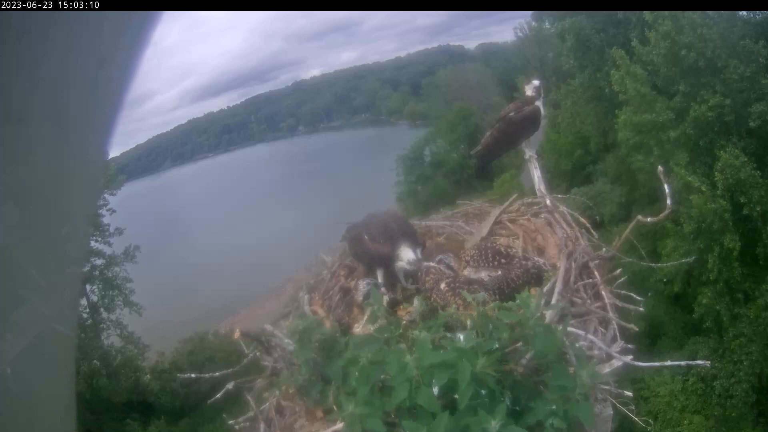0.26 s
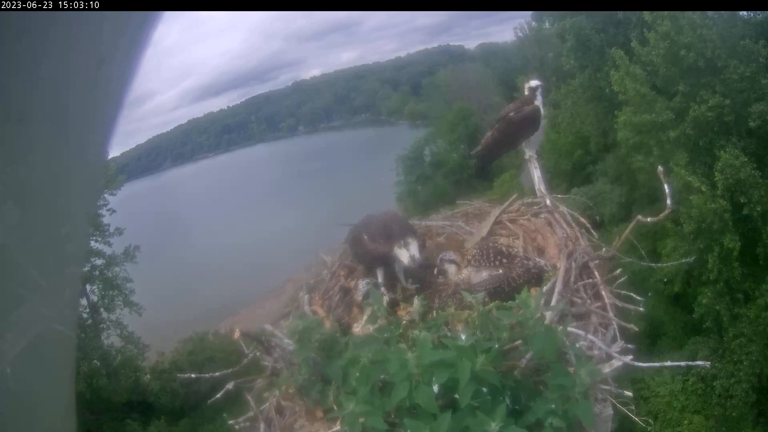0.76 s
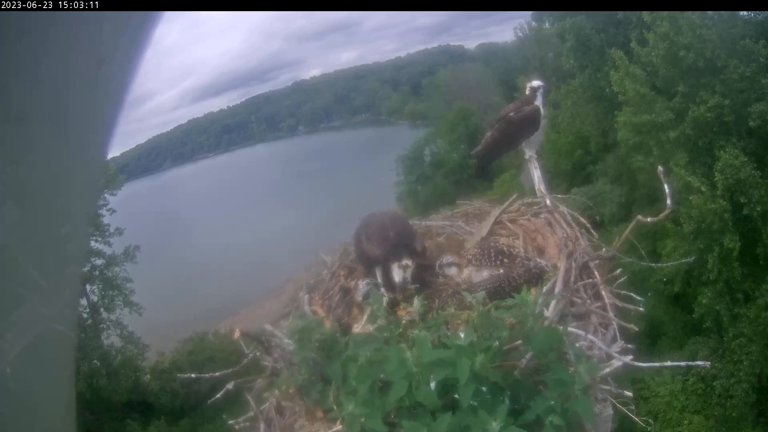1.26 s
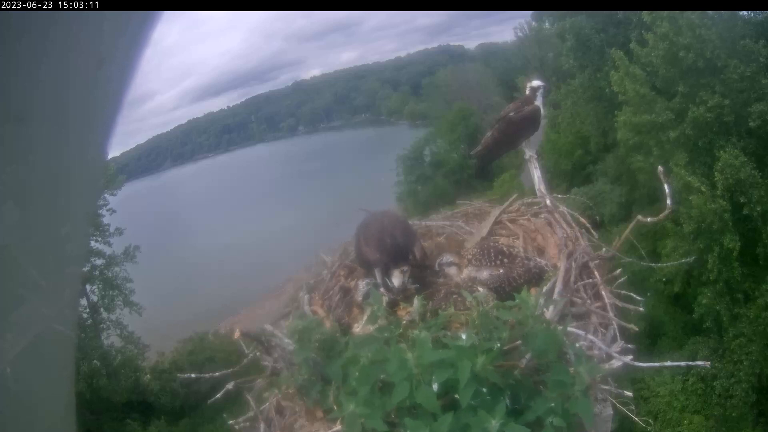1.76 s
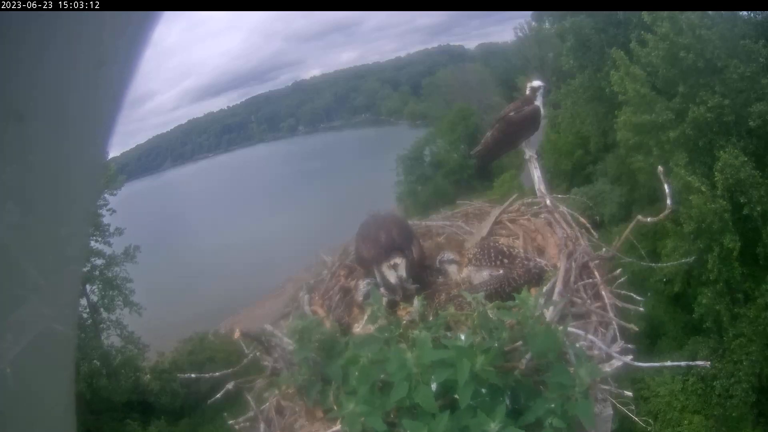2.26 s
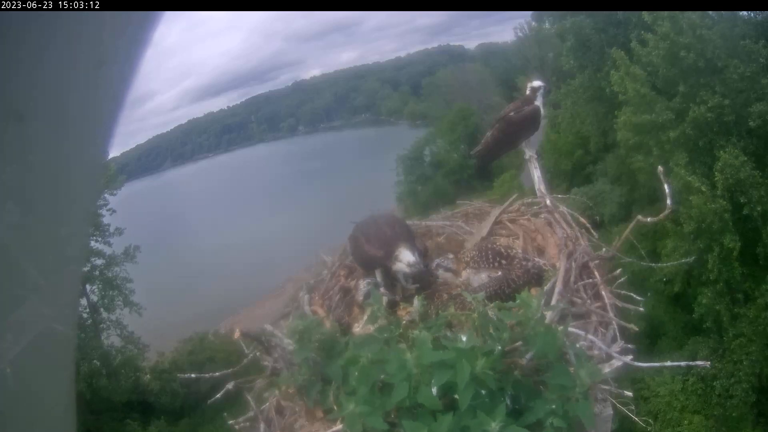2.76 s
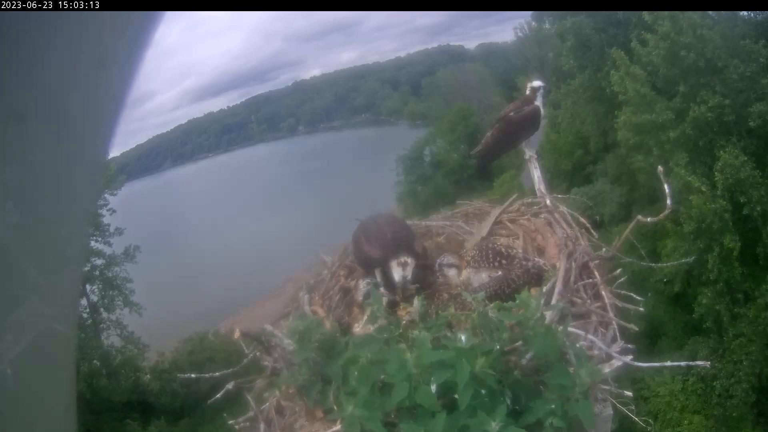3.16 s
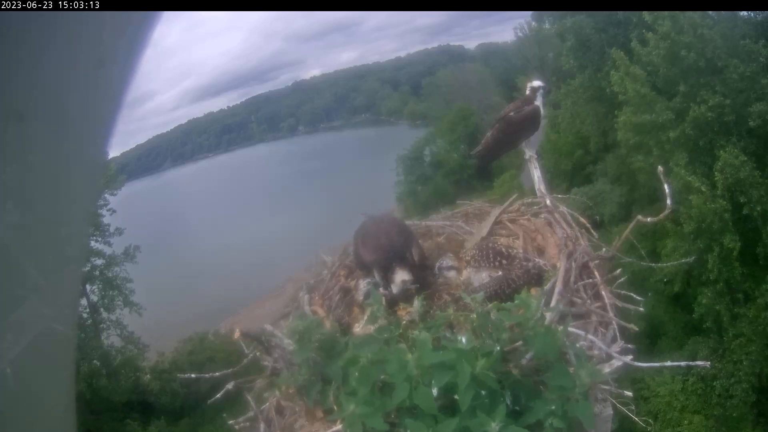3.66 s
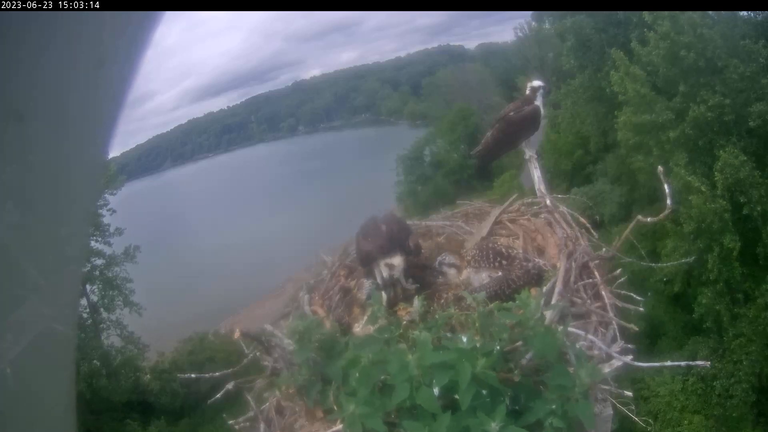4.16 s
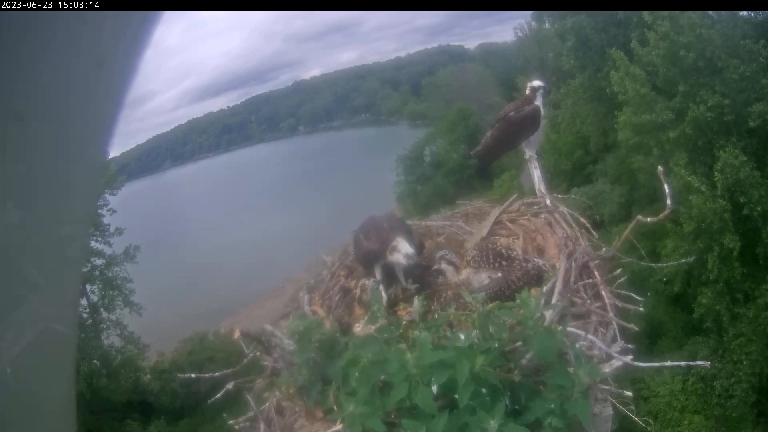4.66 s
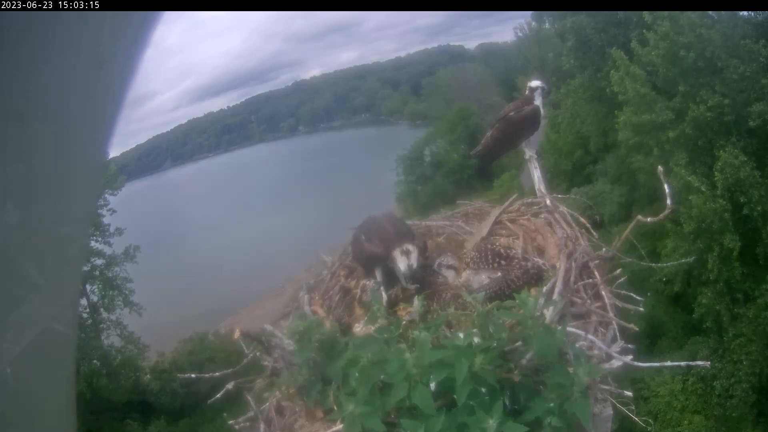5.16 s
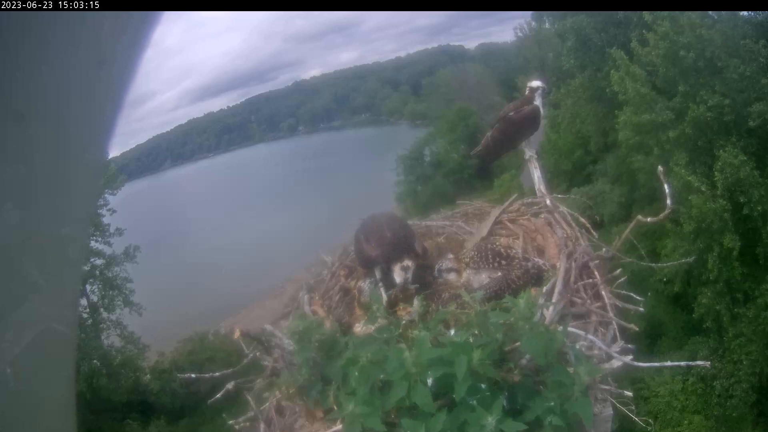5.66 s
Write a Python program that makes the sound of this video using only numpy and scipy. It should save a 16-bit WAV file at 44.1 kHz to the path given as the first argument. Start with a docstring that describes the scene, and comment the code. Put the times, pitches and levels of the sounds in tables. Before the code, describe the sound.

A quiet outdoor nest is heard from a small nearby microphone, with low wind rumble and a faint hiss of leaves throughout. In the first second, twigs shift softly, beaks click dryly, osprey chicks give thin chirps and the parent adds one short, lower whistle. A distant songbird pipes about six even, high notes until 1.2 seconds. A gust bumps the microphone just after 1 second. Short, cracking chirps and clicks come in clusters from 1.3 to 2.4 seconds, with a tiny rattle of ticks near 1.7. The chicks pause, the parent gives one clear whistle at 2.9 seconds, and another gust rumbles around 3.3. From 3.9 to 5.7 seconds the scratchy chirps and beak clicks resume, with a few very brief parent calls between 4.6 and 5. Behind them a far warbler twitters faintly, ending in quick falling notes.

```python
"""A parent osprey gives clear, arched whistles while feeding its chicks in a treetop nest above a lake.
The chicks answer with thin, cracking chirps, led by dry beak clicks. Each voice is a tiny vibrating
membrane that turns rough when strained; each click is a beak snapping shut and ringing briefly.
Twigs shift in the nest, songbirds sing far off in the woods, leaves hiss, and light gusts rumble
on the microphone of a small nest camera."""
import sys
import numpy as np
from scipy import signal
from scipy.fft import rfft, irfft
from scipy.io import wavfile

SR = 44100
rng = np.random.default_rng(int(sys.argv[2]) if len(sys.argv) > 2 else 0)


def unload_audio(sound):
    """Save the sound as a 16-bit wav file, at the path given as the first command line argument."""
    columns = np.transpose(np.atleast_2d(sound))
    # keep every value between -1 and 1, then stretch to whole-number steps
    steps = np.round(np.clip(columns, -1, 1) * 32767)
    wavfile.write(sys.argv[1], SR, steps.astype(np.int16))


N = 260190
TIME = np.arange(N) / SR

# The parent's whistles: start/s, length/s, first f/Hz, top f/Hz, last f/Hz, place of the top/0-1,
# level/dB, swell/dB, roughness/0-1, 2nd harmonic/dB, 3rd harmonic/dB, 4th harmonic/dB
PARENT_WHISTLES = [ (.437, 0.067, 1750, 1894, 1790, 0.49, -37.5, 1, 0.02, -8, -8.5, -23),
                   (2.909, 0.072, 1776, 1902, 1795, 0.58, -35.5, -1.8, 0.021, -8.3, -15, -13.5),
                   (4.582, 0.0247, 1854, 1900, 1665, 0.06, -40.5, -0.26, 0.3, -3.5, -8.5, -34),
                   (4.745, 0.04, 1526, 1558, 1767, 0.031, -47.5, 0.62, 0.12, -7.5, -15, -22),
                   (4.979, 0.016, 1413, 1516, 1620, 0.96, -52, -2, 0.023, -5, -6, -14)]
# The chicks' chirps: the same columns, up to 2nd harmonic/dB
CHICK_CHIRPS = [ (.304, 0.055, 2245, 2517, 2280, 0.74, -42, 4, 0.05, -14.5),
                (.696, 0.023, 3680, 4240, 3440, 0.38, -46, -12, 0.03, -36),
                (.725, 0.021, 2970, 3180, 3840, 0.36, -52.5, -15, 0.16, -37),
                (1.329, 0.066, 2520, 3213, 3155, 0.79, -49, 17, 0.13, -14.5),
                (1.674, 0.042, 2680, 2940, 3050, 0.9, -45, 6.5, 0.11, -20),
                (1.987, 0.017, 2430, 2660, 2330, 0.4, -55.5, -2, 0.2, -27),
                (2.023, 0.039, 2896, 3150, 3030, 0.75, -45.5, -2.5, 0.2, -24),
                (2.287, 0.012, 4740, 5620, 5800, 1, -46.5, -9, 0.06, -17),
                (2.316, 0.015, 3800, 3800, 2980, 0.1, -48.5, 7, 0.29, -9),
                (2.333, 0.0079, 2665, 2800, 3670, 0.24, -46, 1, 0.37, -2),
                (2.344, 0.026, 2960, 3000, 3200, 0.6, -44.5, -4, 0.28, -8.5),
                (3.907, 0.059, 2560, 2884, 2930, 1, -55.5, 3, 0.19, -6.5),
                (4.239, 0.04, 2930, 3710, 3000, 0.62, -53, 8, 0.23, 0),
                (4.287, 0.043, 2796, 3044, 2750, 0.3, -55, -5, 0.38, -7),
                (4.525, 0.059, 2556, 2550, 2680, 0.8, -56, 9, .22, -7),
                (4.795, 0.067, 2350, 2694, 2590, 0.74, -49.5, 10.5, 0.08, -25),
                (5.07, 0.045, 2430, 2910, 2220, 0.18, -54.5, -1, 0.26, -20),
                (5.29, 0.026, 3330, 4220, 4370, 0.85, -44.5, 0, 0, -9.5),
                (5.318, .005, 4170, 3950, 3500, 0.2, -40, -4, 0.1, -13),
                (5.335, 0.031, 2800, 2905, 2790, 0.4, -54.5, -10, 0.1, -2),
                (5.639, 0.044, 2830, 2730, 2975, 0.45, -46, -1.5, 0.16, -6.5)]
# Soft peeps in the nest: middle t/s, f/Hz, level/dB, slide/(octaves per s)
NEST_PEEPS = [(1.255, 3300, -62, 0.5), (4.852, 3480, -55.5, -10), (5.014, 2260, -56.5, 5)]
# Beak clicks: t/s, level/dB, hardness as treble boost/(dB per octave)
BEAK_CLICKS = [(.388, -39.5, 9), (.4405, -40, 1), (.64, -44.5, -1), (.7162, -44.5, 0.5),
               (.767, -43.5, -0.5), (1.293, -40.5, 0.5), (1.303, -44, 4.5), (1.623, -44.5, 1.5),
               (1.632, -48, 2), (1.64, -49.5, -4.5), (1.944, -39.5, 0), (1.957, -39, 2.5),
               (2.2379, -45.5, -2.5), (2.246, -52.5, -3), (2.3226, -45, 3), (3.854, -43.5, 1),
               (4.133, -68.5, 19), (4.282, -45.5, -1), (4.318, -52, 3), (4.722, -47, -3.5),
               (4.729, -43, 4.5), (4.9614, -45, -3), (4.969, -46.5, 0.5), (5.328, -47.5, -2),
               (5.566, -45.5, .5)]
# The tones a beak rings with: f/Hz, level/dB, t60/s (the time it takes to fade by 60 dB)
BEAK_TONES = [(463, 12.5, 0.003), (1650, 0.5, 0.014), (2364, -8.5, 0.03), (3500, -12.5, 0.0053),
              (5300, -24.5, 0.0027)]
# Twigs shifting underfoot: t/s, half width/s, level/dB, t60/s
TWIG_SHIFTS = [(0.159, .025, -58.5, .002), (0.614, 0.0098, -51.5, .06)]
# A far songbird's even piping: middle t/s, level/dB
PIPING_NOTES = [(0.214, -55.5), (0.52, -52), (0.721, -53.5), (0.865, -53), (1.015, -53.5), (1.163, -53.5)]
# A far warbler's twitter: middle t/s, f/Hz, level/dB
TWITTER_NOTES = [(4.11, 5270, -61.5), (4.45, 4350, -58.5), (4.52, 5190, -62), (4.63, 4400, -60),
                 (4.719, 4350, -57.5), (4.87, 4560, -57)]
# The falling notes that end its song: middle t/s, level/dB
FALLING_NOTES = [(5.046, -58), (5.2, -57), (5.352, -59), (5.512, -65)]
# How loudly the treetops hiss: t/s, level/dB
LEAF_LEVELS = [(0, -69.5), (1.5, -74), (3.15, -68.5), (3.6, -73), (5.3, -64.5), (5.8, -75.5)]
# Gusts on the microphone: t/s, half width/s, level/dB
WIND_GUSTS = [(.1, 0.64, -48), (1.065, 0.036, -34.5), (1.19, 0.11, -41.5), (1.629, 0.098, -50),
              (1.97, 0.037, -44), (2.75, .35, -55.5), (3.28, 0.12, -41), (5.6, .45, -56.5)]
# Short dips in the rumble: t/s, half width/s, depth/0-1
RUMBLE_LULLS = [(4.76, 0.12, 0.65)]
# The tone colour of the wind, the air over the lake and the leaves: f/Hz, level/dB
WIND_SPECTRUM = [(14, 9.5), (35, -3.5), (75, -12.5), (110, -20.5), (300, -60.5)]
AIR_SPECTRUM = [(90, 5.5), (250, -3.5), (450, -6.5), (720, -5.5), (1050, -11), (4500, -19.5), (7000, -25.5)]
LEAF_SPECTRUM = [(2300, -27.5), (4500, 2), (6500, -3.5), (7400, -8.5), (8000, -31.5)]

QUAVERS_PER_S = 190   # how fast the voices in the nest tremble


def from_db(db):
    return 10 ** (np.asarray(db) / 20)


def rms_one(x):
    """Scale a sound to an average strength (rms) of 1."""
    return x / np.sqrt(np.mean(x ** 2) + 1e-20)


def low_pass(x, hz, order=2):
    return signal.sosfilt(signal.butter(order, hz, fs=SR, output="sos"), x)


def wander(per_s):
    """A random curve, roughly between -1 and 1, that heads for a new value per_s times a second."""
    steps = np.arange(N) * per_s / SR
    return 1.2 * np.interp(steps, np.arange(N), rng.standard_normal(N))


def coloured_noise(spectrum):
    """Noise with the given tone colour, falling steeply beyond the ends of the table."""
    hz, db = np.transpose(spectrum)
    f = np.maximum(np.fft.rfftfreq(N, 1 / SR), 1)
    gain = from_db(np.interp(np.log(f), np.log(hz), db))
    gain /= (1 + (f / hz[-1]) ** 8) * (1 + (hz[0] / f) ** 4)
    return rms_one(irfft(rfft(rng.standard_normal(N)) * gain, N))


def ring(taps, hz, t60):
    """Every tap starts a pure tone that dies away."""
    decay, turn = 1000 ** (-1 / (t60 * SR)), 2 * np.pi * hz / SR
    return signal.lfilter([0, np.sin(turn)], [1, -2 * decay * np.cos(turn), decay ** 2], taps + 1e-18)


def echoes(x, t60):
    """Countless small echoes from branches and leaves, dying away."""
    tail = rng.standard_normal(SR) * from_db(-60 * TIME[:SR] / t60)
    return signal.fftconvolve(x, tail / np.linalg.norm(tail))[:N]


def note_span(start, end, edge_s):
    """The samples one note covers, and a curve that fades it in and out."""
    at = np.arange(max(int((start - edge_s) * SR), 0), min(int((end + edge_s) * SR), N))
    inside = np.minimum(TIME[at] - start, end - TIME[at]) / edge_s + 1
    return at, np.sin(np.pi / 2 * np.clip(inside, 0, 1)) ** 2


def soft_notes(notes, half_length_s, waver, wavers_per_s):
    """Pure notes that swell and fade while their pitch wavers and may slide."""
    out, shake = np.zeros(N), 1 + waver * wander(wavers_per_s)
    for s, hz, db, octaves_per_s in notes:
        at, fade = note_span(s, s, half_length_s)
        pitch = hz * 2 ** (octaves_per_s * (TIME[at] - s)) * shake[at]
        out[at] += from_db(db) * fade * np.sin(2 * np.pi * np.cumsum(pitch) / SR)
    return out


def woods():
    """A high hiss from the leaves and a soft wash of air over the lake."""
    leaf_db = np.interp(TIME, *np.transpose(LEAF_LEVELS))
    leaves = from_db(leaf_db + 2.5 * wander(25)) * coloured_noise(LEAF_SPECTRUM)
    air = from_db(-61.5 + 1.2 * wander(15)) * coloured_noise(AIR_SPECTRUM)
    return leaves + air


def wind(breeze_db):
    """Swirls of air push on the microphone: a light breeze and short gusts."""
    gusts = sum(from_db(db) * np.exp(-((TIME - s) / width) ** 2) for s, width, db in WIND_GUSTS)
    return (from_db(breeze_db) + gusts) * coloured_noise(WIND_SPECTRUM)


def lulls(x, below_hz):
    """The low rumble drops away for a moment."""
    dip = sum(depth * np.exp(-((TIME - s) / width) ** 4) for s, width, depth in RUMBLE_LULLS)
    rumble = signal.sosfiltfilt(signal.butter(4, below_hz, fs=SR, output="sos"), x)
    return x - dip * rumble


def piping_bird(note_hz, lead_hz, echo_s):
    """Far-off notes, each led by a faint lower one; the woods echo them and let them trail on."""
    notes = [(s, note_hz, db, 0) for s, db in PIPING_NOTES]
    leads = [(s - .07, lead_hz, db - 12.5, 0) for s, db in PIPING_NOTES]
    song = soft_notes(notes + leads, half_length_s=.04, waver=.0031, wavers_per_s=74)
    song += from_db(-16) * np.interp(TIME - echo_s, TIME, song)
    return song + from_db(-13) * echoes(song, t60=.8)


def warbler(ending_hz, octaves_per_s):
    """A twitter that ends in quick falling notes, so far away that much of it arrives as echo."""
    twitter = [(s, hz, db, 0) for s, hz, db in TWITTER_NOTES]
    ending = [(s, ending_hz, db, octaves_per_s) for s, db in FALLING_NOTES]
    song = soft_notes(twitter, half_length_s=.065, waver=.05, wavers_per_s=220)
    song += soft_notes(ending, half_length_s=.032, waver=.016, wavers_per_s=600)
    return from_db(-2) * song + echoes(song, t60=.7)


def twigs(hz, hollow_hz):
    """A bird shifts its weight: twigs rustle, or creak with a short, hollow, crumbly note."""
    out = np.zeros(N)
    slips = rng.standard_normal(N) * from_db(6.1 * wander(360))
    for s, width, db, t60 in TWIG_SHIFTS:
        creak = rms_one(ring(slips, hz, t60) + .5 * ring(slips, hollow_hz, t60))
        out += from_db(db) * np.exp(-((TIME - s) / width) ** 2) * creak
    return out


def rattle(start_s, gap_s, count, db, growth_db, hz, t60):
    """A quick, even run of dry ticks, each a little louder, ringing over the beak's lowest tone."""
    k, ticks = np.arange(count), np.zeros(N)
    ticks[np.round((start_s + gap_s * k) * SR).astype(int)] = from_db(db + growth_db * k)
    low_hz, _, low_t60 = BEAK_TONES[0]
    return ring(ticks, hz, t60) + .5 * ring(ticks, low_hz, low_t60)


def bounces(count, shortest_gap_s, loss_db):
    """One touch and the weaker, unevenly spaced ones that follow it at once."""
    gaps = shortest_gap_s * (1 + 2 * rng.random(count))
    at = np.round((np.cumsum(gaps) - gaps) * SR).astype(int)
    touches = np.zeros(SR // 10)
    touches[at] = from_db(-loss_db * np.sqrt(np.arange(count)))
    return touches


def beak_clicks(snap_hz, snap_db, snap_t60):
    """Each click is a dull snap plus a brief ring, a little different every time."""
    out = np.zeros(N + SR)
    for s, db, hardness in BEAK_CLICKS:
        touches = bounces(count=4, shortest_gap_s=.0011, loss_db=9)
        at = round(s * SR) + np.arange(len(touches))
        for hz, tone_db, t60 in [(snap_hz, snap_db, snap_t60), *BEAK_TONES]:
            chance_db, shift = rng.standard_normal(2)   # the ring shifts as the beak opens and closes
            gain = from_db(db + tone_db + hardness * np.log2(hz / snap_hz) + chance_db)
            out[at] += gain * ring(touches, hz * np.exp(.055 * shift), t60)
    out -= low_pass(out, hz=129, order=1)   # a small beak gives off little bass
    out = low_pass(out, hz=5040)[:N]
    out = 2 * low_pass(out, hz=1510, order=1) - out   # the low tones lag, which blunts the edge
    return out + from_db(-11) * echoes(out, t60=.035)


def arch(progress, first_hz, top_hz, last_hz, top_at):
    """Pitch as a call's progress runs from 0 to 1: it eases to top_hz, then speeds towards last_hz."""
    top_at = np.clip(top_at, .02, .99)
    climb = np.sin(np.pi / 2 * np.clip(progress / top_at, 0, 1)) ** 1.15
    drop = np.clip((progress - top_at) / (1 - top_at), 0, 1) ** 2.2
    return first_hz + (top_hz - first_hz) * climb + (last_hz - top_hz) * drop


def voice_box(calls, jitter, quaver, quaver_db, rasp, rasp_hz, opening_db, edge_s, clearing):
    """A whistling membrane; under strain its pitch shakes, its level flutters and air hisses through."""
    out = np.zeros(N)
    fast_shake, slow_shake = wander(1400), wander(QUAVERS_PER_S)
    falter = np.tanh(wander(QUAVERS_PER_S))
    flutter = np.sin(2 * np.pi * np.cumsum(rasp_hz * (1 + .2 * wander(200))) / SR)
    breath = rms_one(low_pass(np.diff(rng.standard_normal(N + 1)), hz=5400))
    for start, length, first_hz, top_hz, last_hz, top_at, db, swell_db, roughness, *upper_db in calls:
        at, fade = note_span(start, start + length, edge_s)
        progress = np.clip((TIME[at] - start) / length, 0, 1)
        rough = roughness * (1 + clearing * np.cos(np.pi * progress))
        pitch = arch(progress, first_hz, top_hz, last_hz, top_at)
        pitch *= 1 + rough * (jitter * fast_shake[at] + quaver * slow_shake[at])
        phase = 2 * np.pi * np.cumsum(pitch) / SR
        # the beak is widest, and the tone brightest, where the pitch is highest
        bright = fade * from_db(opening_db * np.maximum(np.log2(pitch / top_hz), -.12))
        tone = sum(from_db(harmonic_db) * bright ** np.sqrt(k) * np.sin((k + 1) * phase)
                   for k, harmonic_db in enumerate([0] + upper_db))
        tone += 2.9 * rough ** 2 * breath[at]
        strain = rms_one(from_db(quaver_db * rough * falter[at]) * (1 + rasp * rough * flutter[at]))
        # the call grows or fades steadily, and sags at both ends
        level_db = db + swell_db * (progress - .5) - 4.5 * (2 * progress - 1) ** 4
        out[at] += np.sqrt(2) * fade * from_db(level_db) * tone * strain
    return out


def chicks():
    """Thin, strained chirps that crack at first and then clear."""
    return voice_box(CHICK_CHIRPS, jitter=.12, quaver=.075, quaver_db=17.5, rasp=1.93, rasp_hz=660,
                     opening_db=4.5, edge_s=.0033, clearing=.44)


def parent():
    """Lower, clearer whistles that brighten as the beak opens."""
    return voice_box(PARENT_WHISTLES, jitter=.08, quaver=.061, quaver_db=16, rasp=.69, rasp_hz=726,
                     opening_db=33.5, edge_s=.007, clearing=0)


def scene():
    """The nest up close, with far songbirds, leaves and wind behind it, in one channel."""
    nest = low_pass(parent() + chicks(), hz=5980, order=4)
    nest += soft_notes(NEST_PEEPS, half_length_s=.029, waver=.008, wavers_per_s=QUAVERS_PER_S)
    nest += twigs(hz=1216, hollow_hz=463)
    nest += beak_clicks(snap_hz=1263, snap_db=-3, snap_t60=.01)
    nest += rattle(start_s=1.6985, gap_s=.0114, count=6, db=-43.5, growth_db=1.46, hz=1785, t60=.0057)
    nest += from_db(-20) * echoes(nest, t60=.11)
    nest += from_db(-35) * echoes(nest, t60=.6)
    songbirds = piping_bird(note_hz=4586, lead_hz=2470, echo_s=.11)
    songbirds += warbler(ending_hz=6240, octaves_per_s=-10.5)
    background = lulls(woods() + wind(breeze_db=-56.5), below_hz=167)
    return (nest + songbirds + background)[None]


def record(dry):
    """The camera samples coarsely: it mirrors a little treble upwards, cuts the rest, adds an offset."""
    rate_hz, cutoff_hz, offset = 16000, 8600, .0131
    heard = signal.sosfilt(signal.ellip(8, .2, 70, .49 * rate_hz, fs=SR, output="sos"), dry)
    mirrored = from_db(-15) * 2 * np.cos(2 * np.pi * rate_hz * TIME) * heard
    treble_cut = signal.ellip(8, .2, 70, cutoff_hz, fs=SR, output="sos")
    return signal.sosfilt(treble_cut, heard + mirrored) + offset


dry = scene()
out = record(dry)
unload_audio(out)
```